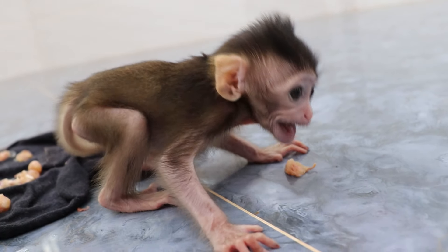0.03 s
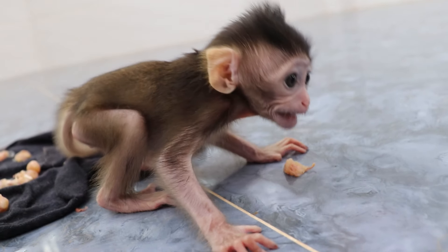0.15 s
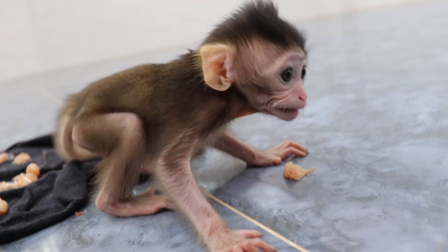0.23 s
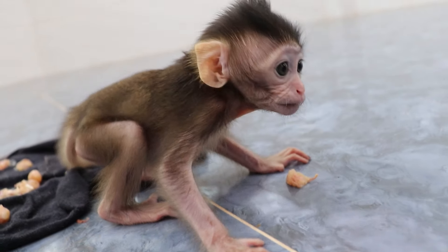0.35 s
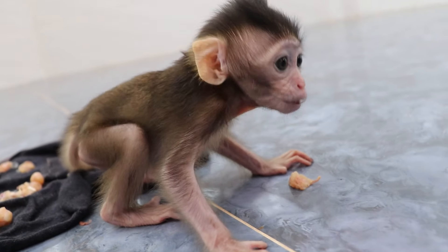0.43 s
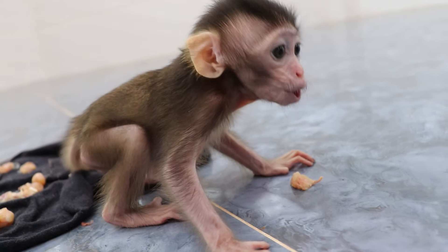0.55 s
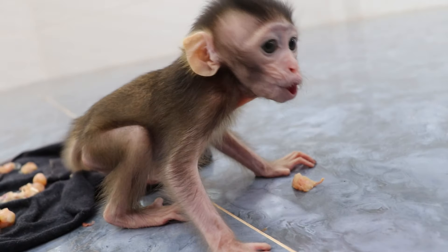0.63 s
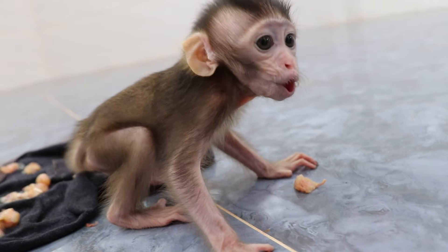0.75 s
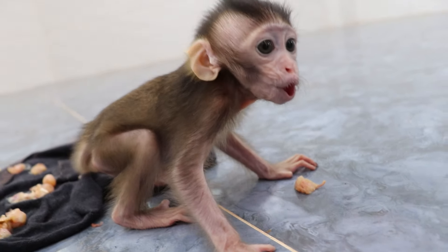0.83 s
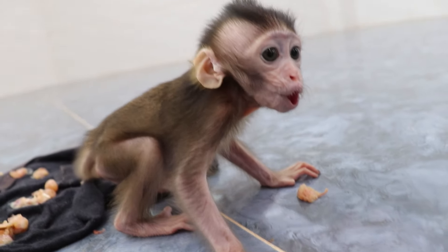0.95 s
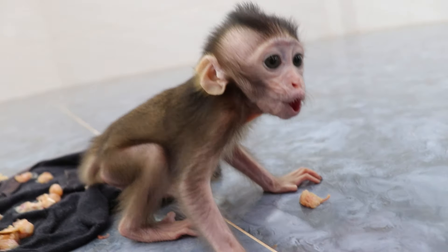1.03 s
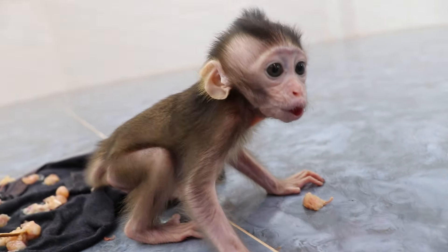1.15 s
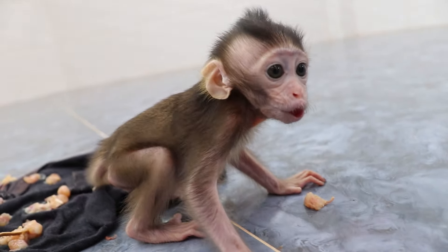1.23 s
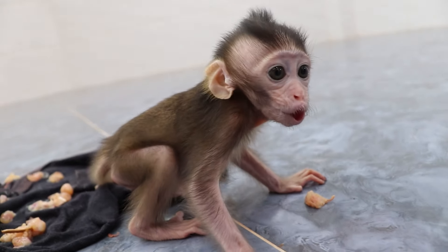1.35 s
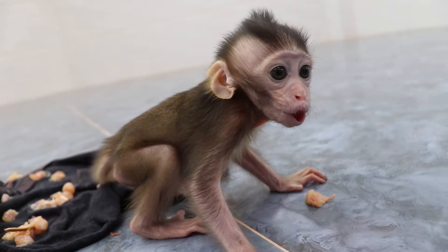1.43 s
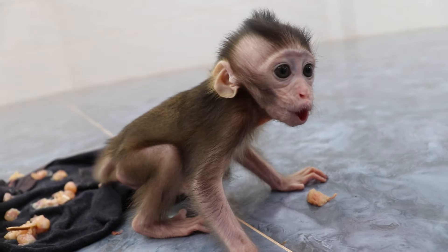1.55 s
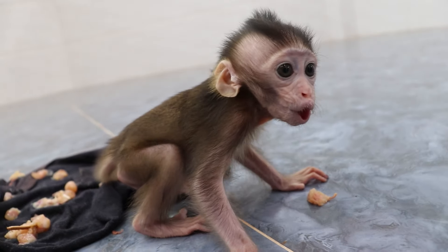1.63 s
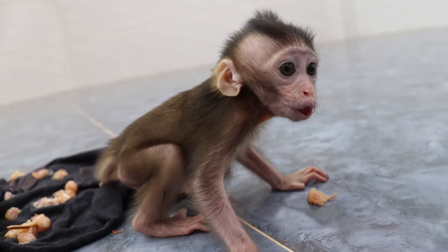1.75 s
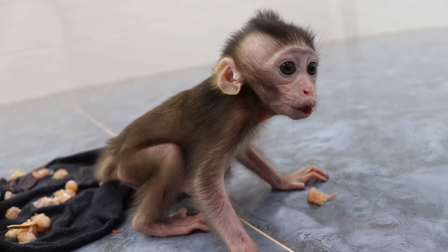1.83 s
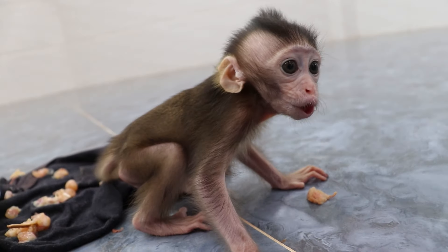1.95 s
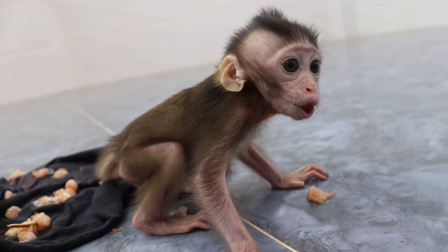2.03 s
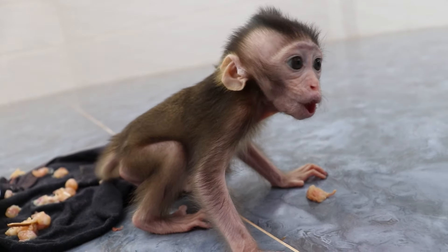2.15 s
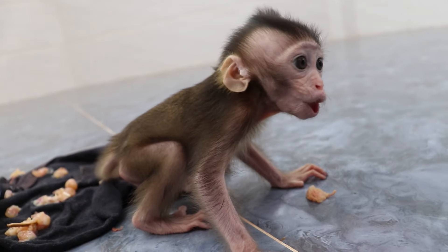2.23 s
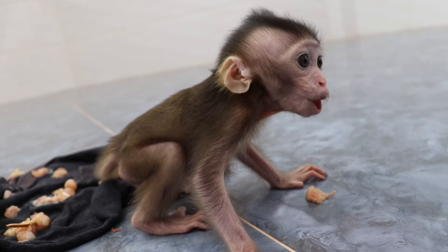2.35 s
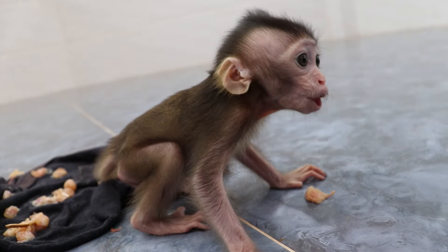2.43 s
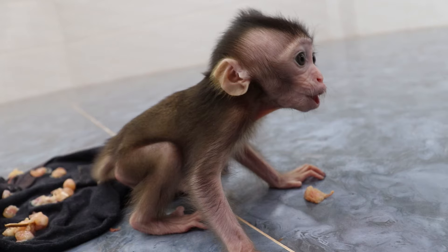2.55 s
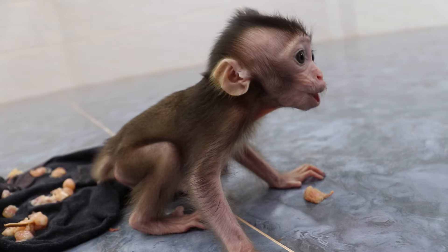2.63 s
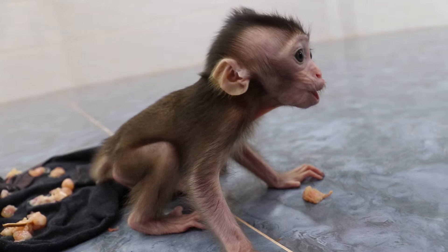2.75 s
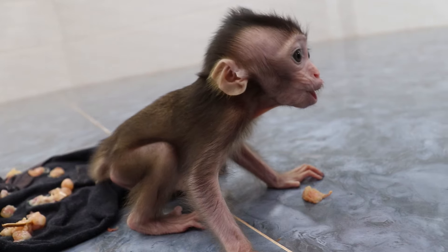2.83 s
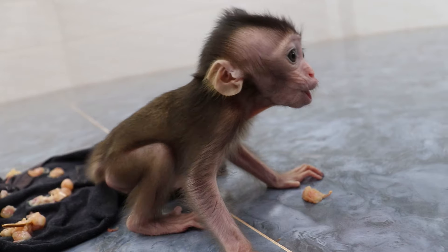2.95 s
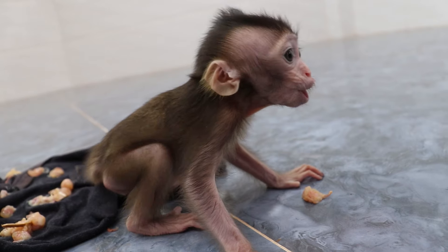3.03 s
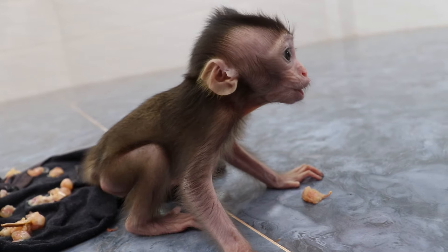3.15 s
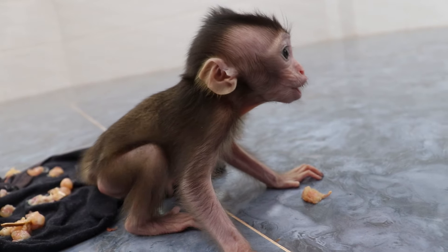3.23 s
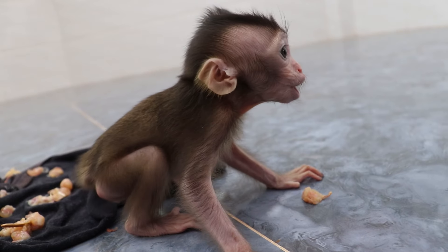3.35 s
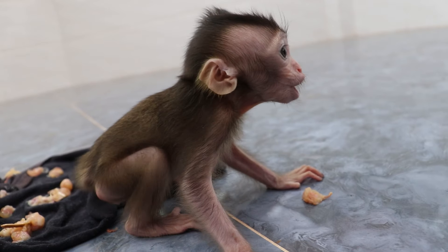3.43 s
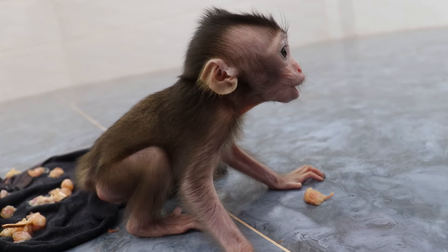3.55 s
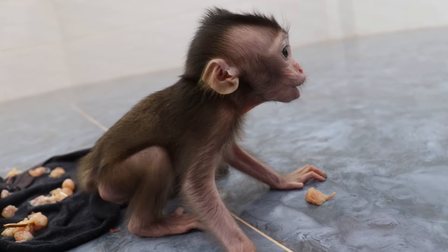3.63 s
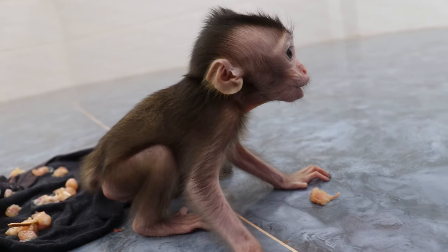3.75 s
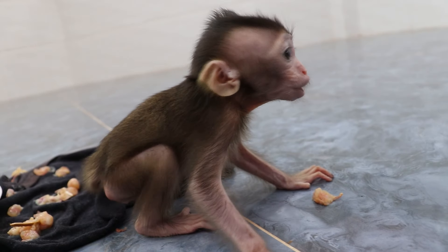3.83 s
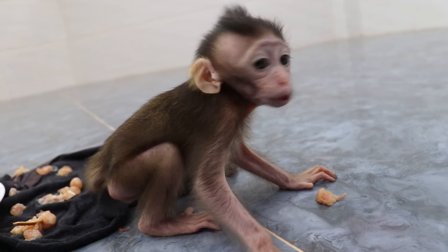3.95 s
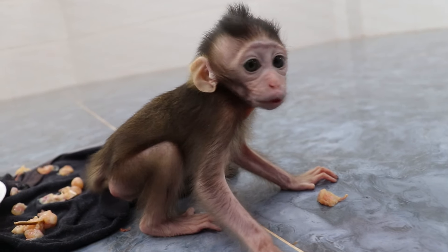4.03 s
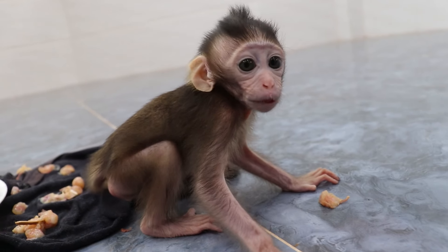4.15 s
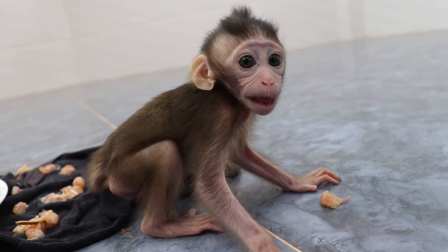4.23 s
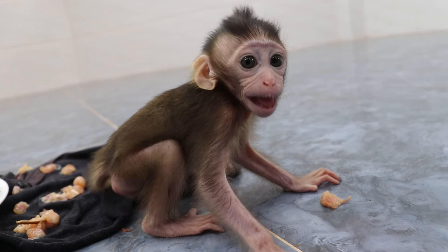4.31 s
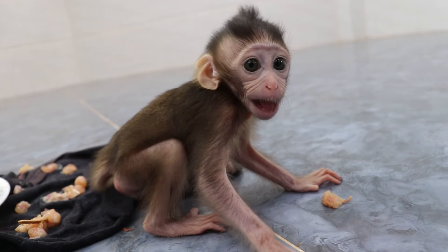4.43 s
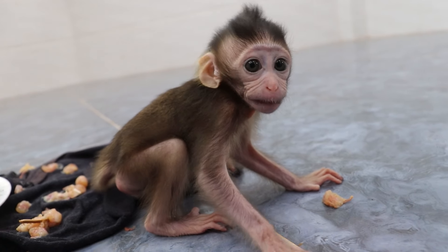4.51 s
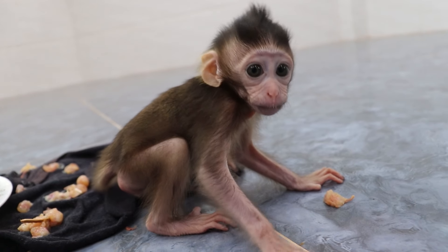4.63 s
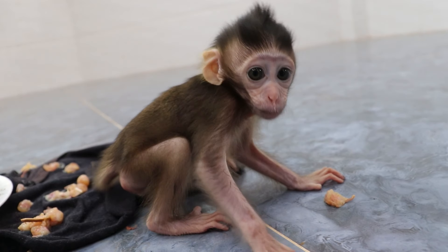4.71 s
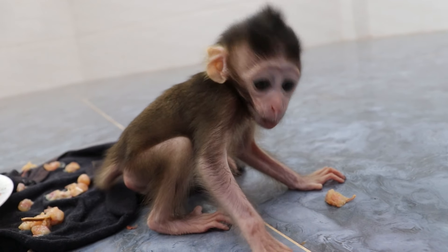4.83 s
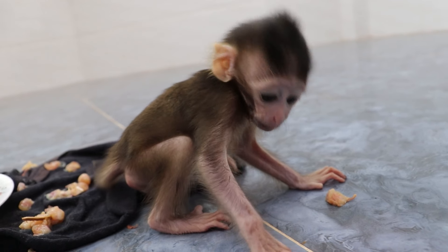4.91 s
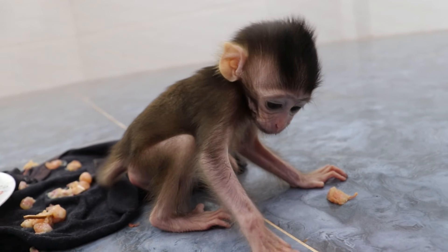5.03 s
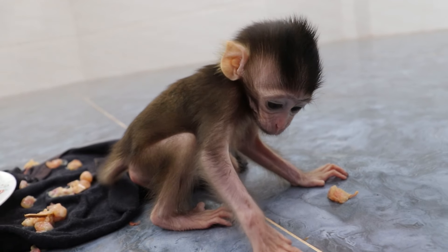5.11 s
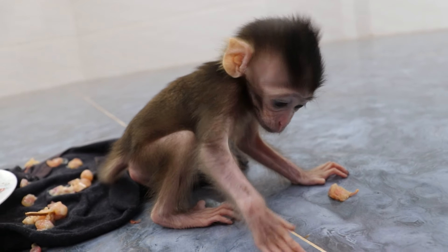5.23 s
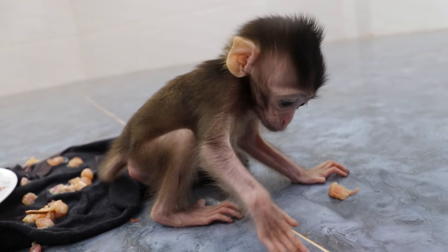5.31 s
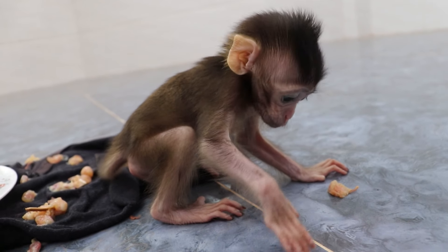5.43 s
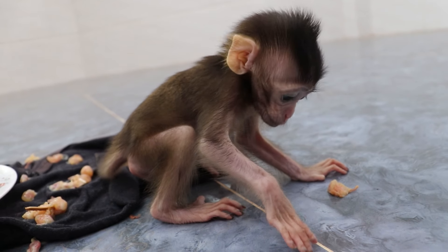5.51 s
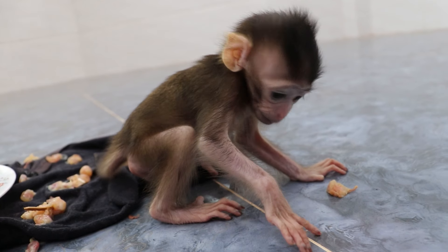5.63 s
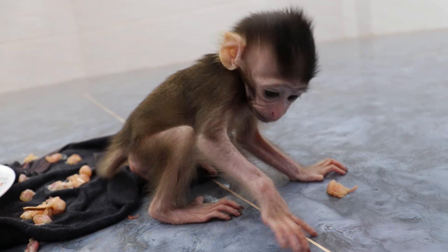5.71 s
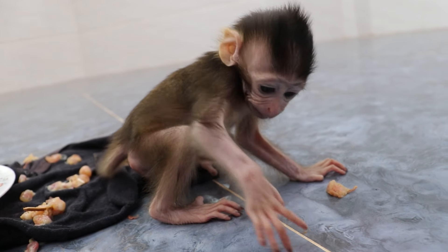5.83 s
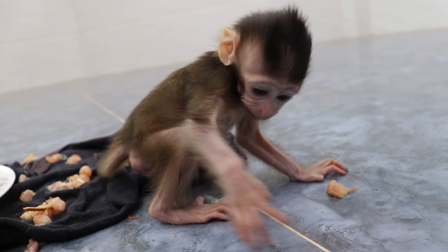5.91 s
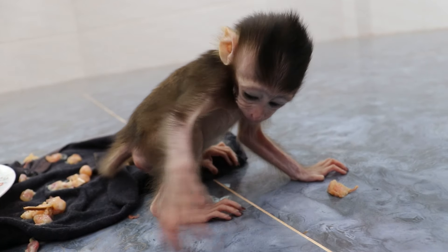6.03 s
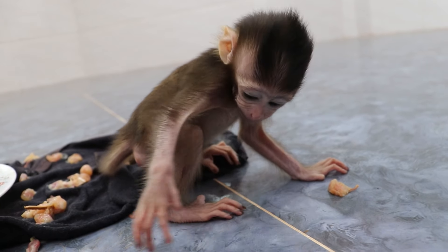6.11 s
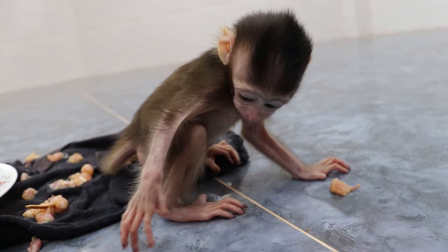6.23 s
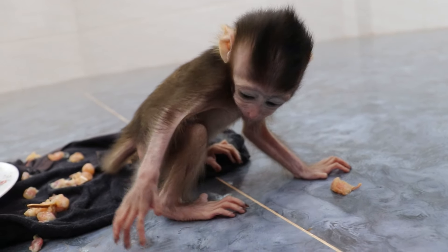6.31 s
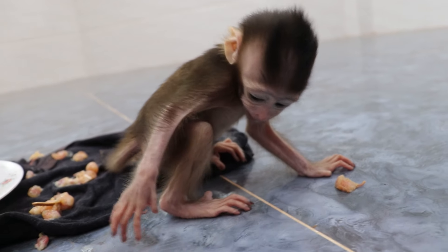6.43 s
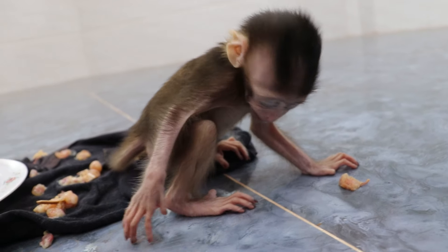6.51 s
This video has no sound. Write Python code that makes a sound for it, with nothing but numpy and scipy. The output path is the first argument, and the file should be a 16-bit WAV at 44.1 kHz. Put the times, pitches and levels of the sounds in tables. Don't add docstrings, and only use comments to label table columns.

```python
import sys
import numpy as np
from scipy import signal
from scipy.fft import rfft, irfft, next_fast_len
from scipy.io import wavfile
from scipy.ndimage import uniform_filter1d

SR = 44100
rng = np.random.default_rng(int(sys.argv[2]) if len(sys.argv) > 2 else 0)


def to_linear_factor(level_db):
    exponent = np.asarray(level_db, float) / 20
    return 10 ** exponent


def master(y):
    cut = np.clip(np.atleast_2d(y).T, -1, 1)
    pcm = np.round(cut * 32767)
    wavfile.write(sys.argv[1], SR, pcm.astype(np.int16))


N = 289737


def at_hz(points, hz):
    table_hz, values = np.array(points).T
    return np.interp(np.log(hz), np.log(table_hz), values)


def rms_one(x):
    return x / np.sqrt(np.mean(x ** 2) + 1e-20)


def drift(rate_hz, size):
    r = np.exp(-2 * np.pi * rate_hz / SR)
    noise = rng.standard_normal(size + 4000)
    wander = signal.lfilter([1], [1, -2 * r, r * r], noise)
    return rms_one(wander[4000:])


def resonate(x, modes):
    out = 0
    for k, (hz, width_hz, db) in enumerate(modes):
        r = np.exp(-np.pi * width_hz / SR)
        b = (1 - r * r) / 2 * np.array([1, 0, -1])
        a = [1, -2 * r * np.cos(2 * np.pi * hz / SR), r * r]
        out = out + (-1) ** k * to_linear_factor(db) * signal.lfilter(b, a, x)
    return out


def resonate_twice(x, modes):
    return rms_one(resonate(resonate(x, modes), modes))


def add(mix, s, sound, pan_db=0, room_db=0):
    i = round(s * SR)
    sound = sound[:N - i]
    gains_db = np.array([[pan_db / 2], [-pan_db / 2], [room_db]])
    mix[:, i:i + len(sound)] += sound * to_linear_factor(gains_db)


# (time [s], pitch [Hz])
COO_PITCH = [
    [(.696, 1204.5), (.724, 1255), (.808, 1327), (.852, 1332.5), (.884, 1396.5), (.984, 1439),
     (1.078, 1517.5), (1.132, 1501), (1.146, 1473)],
    [(1.496, 1331.5), (1.512, 1379.5), (1.53, 1448), (1.588, 1480), (1.616, 1536.5), (1.68, 1511),
     (1.722, 1547.5), (1.765, 1521)],
    [(2.142, 1364.5), (2.16, 1481.5), (2.206, 1474), (2.24, 1576), (2.276, 1545.5), (2.304, 1525),
     (2.37, 1543), (2.43, 1608), (2.462, 1556)],
    [(2.796, 1342), (2.808, 1396.5), (2.864, 1418), (2.916, 1508), (2.942, 1455), (2.976, 1457),
     (3.054, 1519), (3.1, 1555), (3.143, 1482.5)],
    [(3.478, 1723.5), (3.51, 1930.5), (3.54, 1972.5), (3.566, 1920.5), (3.596, 1959.5), (3.674, 1742),
     (3.708, 1670), (3.76, 1627), (3.834, 1590.5)],
]
# (time [s], level [dB])
COO_EFFORT = [
    [(0.696, -34), (0.704, -30), (0.718, -25.5), (0.846, -15.5), (0.886, -20), (0.914, -14), (1.132, -15.5),
     (1.146, -15)],
    [(1.496, -31), (1.502, -29.5), (1.518, -21.5), (1.692, -19.5), (1.72, -11.5), (1.752, -15),
     (1.765, -16.5)],
    [(2.142, -37), (2.154, -25), (2.286, -18), (2.312, -22.5), (2.344, -16), (2.416, -17.5), (2.424, -23.5),
     (2.462, -15.5)],
    [(2.796, -30), (2.806, -29), (2.868, -20.5), (3.068, -15), (3.08, -16.5), (3.11, -14), (3.136, -17.5),
     (3.143, -21.5)],
    [(3.478, -28), (3.486, -27), (3.5, -20.5), (3.54, -16.5), (3.582, -16.5), (3.59, -17.5), (3.792, -20),
     (3.834, -20)],
]
# (time after [s], pitch change [Hz], level change [dB])
VOICE_BREAK = [(.006, -51, -7.5), (0.017, -230, -13), (0.023, -290, -22)]
COO_AIR_DB = [-1, 0.7, 0.5, -3, -0.5]
# (room [dB], room for overtones [dB], left over right [dB],
# brightening over the call [dB], brightness [dB])
COO_PLACE = [(-1, -3, -0.5, 18, -2), (1.5, -4, 1.6, 12, 0), (2.1, -2, 2.5, 9, 2.6), (1.5, 0, 0, 18.5, 0.1),
             (7.5, -5, 0, 2.5, 4.5)]
# (frequency [Hz], level [dB])
MOUTH = [(2400, -34), (2700, -19), (3000, -12.5), (3400, -10.5), (3900, 0), (4200, -5), (4800, -17),
         (5800, -33)]
# (frequency [Hz], level [dB])
THROAT = [(4500, 37), (5500, -3.5), (6800, -28), (8000, -5.5), (9000, 5.5), (10300, -2.7), (12000, -15.5),
          (16500, -29)]
# (frequency [Hz], width [Hz], level [dB])
BREATH = [(1630, 610, 3), (3800, 1200, 6), (12000, 21000, -10)]
FIRST_DB_PER_OCTAVE = -8
SECOND_DB, THIRD_DB, UPPER_DB, BREATH_DB = 4.5, -13.5, -29.5, -26.5
PRESS_FOLLOWS = 0.51
BREATH_OPENS = 0.57
OPEN_AT = .7
GUST_DB = 1.5


def coos(mix):
    for pitch, effort, air_db, head in zip(COO_PITCH, COO_EFFORT, COO_AIR_DB, COO_PLACE):
        room_db, beam_db, pan_db, opening_db, bright_db = head
        fall = np.array(VOICE_BREAK)
        pitch_s, pitch_hz = np.vstack([pitch, np.add(pitch[-1], fall[:, :2])]).T
        effort_end = (pitch[-1][0], effort[-1][1])
        effort_s, effort_db = np.vstack([effort, np.add(effort_end, fall[:, ::2])]).T
        start, end = pitch_s[0], pitch_s[-1]
        t = np.arange(start, end, 1 / SR)
        size = len(t)

        hz = uniform_filter1d(np.interp(t, pitch_s, pitch_hz), size=400)
        hz = hz * (1 + .0006 * drift(40, size))
        phase = 2 * np.pi * np.cumsum(hz) / SR

        first_db = np.interp(t, effort_s, effort_db)
        mean_db = first_db.mean()
        press_db = mean_db + PRESS_FOLLOWS * (first_db - mean_db)
        opened = np.minimum((t - start) / (end - start) / OPEN_AT, 1)
        open_db = opening_db * (opened - .5)
        upper_db = press_db + UPPER_DB + bright_db + open_db
        breath_db = press_db + BREATH_DB + air_db + BREATH_OPENS * open_db

        low = to_linear_factor(first_db + FIRST_DB_PER_OCTAVE * np.log2(hz / 1500)) * np.sin(phase)
        middle = to_linear_factor(press_db + SECOND_DB + at_hz(MOUTH, 2 * hz)) * np.cos(2 * phase)
        middle += to_linear_factor(press_db + THIRD_DB + at_hz(MOUTH, 3 * hz)) * np.sin(3 * phase)
        upper = 0
        for k in range(4, 11):
            shimmer_db = 4 * drift(30, size)
            level = to_linear_factor(upper_db + at_hz(THROAT, k * hz) + shimmer_db)
            upper += level * (k * hz < 17000) * np.sin(k * phase)

        gust_db = GUST_DB * drift(13.4, size)
        breath = to_linear_factor(breath_db + gust_db) * resonate_twice(rng.standard_normal(size), BREATH)
        rasp = resonate_twice(rng.standard_normal(size), [(9200, 1600, 0)])
        breath += to_linear_factor(upper_db - 4.5) * rasp

        to_edge_s = np.minimum(t - start, end - t)
        fade = np.clip(to_edge_s / .006, 0, 1)
        slow_fade = np.clip(to_edge_s / .035, 0, 1)
        add(mix, start, fade * to_linear_factor(3.0) * low, pan_db, room_db)
        add(mix, start, fade * to_linear_factor(2.0) * middle, pan_db - 3.0, beam_db)
        add(mix, start, slow_fade * (upper + breath), pan_db + 4.0, beam_db - 1.5)


# (time
# [s], length [s], start pitch [Hz], end pitch [Hz], level [dB])
THROATY = [(0.156, 0.0079, 3210, 2200, -11), (0.168, 0.0097, 2250, 1345, -23),
           (4.388, 0.013, 7170, 6500, -12), (4.416, 0.0048, 4210, 3750, -7),
           (5.916, 0.0096, 3230, 2630, -16.5), (5.921, 0.0121, 5580, 4750, -15),
           (5.932, 0.0045, 2300, 990, -15.5), (5.97, 0.0085, 550, 483, -23.5),
           (6.498, 0.015, 5500, 5330, -11)]
# (time
# [s], length [s], start pitch [Hz], end pitch [Hz], level [dB])
THIN = [(0.149, 0.013, 4610, 2830, -19), (.148, 0.014, 9560, 8100, -22.5), (.2, 0.0096, 11100, 6570, -29),
        (4.37, 0.0021, 3460, 3550, -26), (4.394, 0.017, 10500, 9140, -7), (5.9126, 0.0011, 4300, 4220, -10),
        (6.2314, 0.0044, 3980, 3800, -10), (6.503, 0.01, 4450, 4070, -14)]
# (time [s], length [s], start pitch [Hz], end pitch [Hz], level [dB])
TURNED_AWAY = [(0.15, 0.0228, 4960, 4534, -19), (4.363, 0.001, 3620, 2920, -17),
               (4.377, 0.0053, 3940, 3380, -24), (5.923, 0.0074, 2800, 2340, -16.5)]
# (octave [dB], room [dB])
CHIRP_KINDS = [
    (-17.5, -1),
    (-31, -4.5),
    (-23, 11.5),
]
BEAM_DB_PER_OCTAVE, BEAM_CENTRE_HZ = 8, 4300
CHIRP_ROUGH = .2


def chirps(mix):
    for rows, (octave_db, room_db) in zip([THROATY, THIN, TURNED_AWAY], CHIRP_KINDS):
        for s, length, start_hz, end_hz, db in rows:
            u = np.arange(0, 1, 1 / (length * SR))
            hz = start_hz * (end_hz / start_hz) ** u ** 1.153
            phase = 2 * np.pi * np.cumsum(hz) / SR
            tone = np.sin(phase) + to_linear_factor(octave_db) * np.sin(2 * phase)
            swell = np.sin(np.pi * u) ** .7
            swell = swell * (1 + CHIRP_ROUGH * drift(700, len(u)))
            pan_db = BEAM_DB_PER_OCTAVE * np.log2(start_hz / BEAM_CENTRE_HZ)
            add(mix, s, to_linear_factor(db) * swell * tone, np.clip(pan_db, -5, 5), room_db)


# (time [s], length [s])
HISS_SPANS = [
    (.143, .005),
    (.149, .021),
    (4.388, .033),
    (5.922, .014),
    (6.242, .016),
    (6.4755, .0345),
]
# (level [dB], tilt [dB per octave], room [dB], left over right [dB])
HISSES = [(-24.5, -12, 9, 8), (-27, -8.5, 3.5, 4), (-13, 0.5, 2.4, 5.5), (-31.5, 4, -2.5, 1),
          (-29.5, -7.5, -1.5, 2), (-9.5, -0.5, -1.5, -0.5)]
# (frequency [Hz], width [Hz], level [dB])
HISS_MOUTH = [(3000, 2700, -29), (4300, 1950, 2), (7420, 570, 9.5), (10150, 2000, 6.5), (12500, 3000, -2.5),
              (14500, 1700, -8)]


def hisses(mix):
    high_pass = signal.butter(3, 2600, "high", fs=SR, output="sos")
    for (s, length), (db, tilt_db, room_db, pan_db) in zip(HISS_SPANS, HISSES):
        u = np.arange(0, 1, 1 / (length * SR))
        air = 0
        for hz, width_hz, level_db in HISS_MOUTH:
            mode = [(hz, width_hz, level_db + tilt_db * np.log2(hz / 7000))]
            flutter = to_linear_factor(3 * drift(90, len(u)))
            air = air + flutter * resonate(rng.standard_normal(len(u)), mode)
        air = rms_one(signal.sosfilt(high_pass, air))
        ends = np.clip(np.minimum(u, 1 - u) / .08, 0, 1)
        add(mix, s, to_linear_factor(db) * ends * air, np.clip(pan_db, -4, 4), room_db)


# (time [s], level [dB], ring [Hz], snap [dB], left over right [dB])
CLICKS = [(.1348, -21, 3000, -16, 1), (.51, -37, 703, -47, 6), (.584, -47, 850, -39.5, -32),
          (2.17, -35, 520, -62, 4), (4.2935, -28, 2520, -53, 0), (4.315, -37.5, 920, -44, 0),
          (4.3628, -51, 623, -17, 2), (4.44, -38.5, 730, -51, 0), (4.987, -55, 1700, -94, -9),
          (5.064, -35.5, 3200, -51, -3), (5.2, -42, 2600, -44, -2), (5.31, -36.5, 1010, -32, -3),
          (5.562, -37.5, 900, -29, 3), (5.685, -48, 530, -58, -18), (5.7, -45, 2520, -53, -18),
          (5.752, -43, 3540, -50, -0.5), (6.2205, -51, 4040, -17, 5), (6.2415, -44, 1170, -22, -6),
          (6.473, -26.5, 1440, -40, 0), (6.525, -34.5, 527, -50, 0)]


def clicks(mix):
    t = np.arange(900) / SR
    for s, db, hz, snap_db, pan_db in CLICKS:
        ring = np.sin(2 * np.pi * hz * t) * np.exp(-t * hz / 1.98)
        ring = ring * (1 - np.exp(-t * hz * 8.1))
        grit = rng.standard_normal(901)
        snap = (grit[1:] + grit[:-1] / 4) * np.exp(-t / 0.0007) / 2
        add(mix, s, to_linear_factor(db + 3.5) * ring + to_linear_factor(snap_db) * snap, pan_db, room_db=6.5)


# (frequency [Hz], lag [samples])
RIGHT_LAG = [(1500, 2.8), (4000, 2.4), (9000, 1.6), (16000, .8)]


def place(sources, lag_share):
    mix = np.zeros((3, N))
    for source in sources:
        source(mix)
    size = next_fast_len(N + 64)
    hz = np.maximum(np.fft.rfftfreq(size, 1 / SR), 1)
    lag_s = lag_share * at_hz(RIGHT_LAG, hz) / SR
    turned = rfft(mix[1], size) * np.exp(-2j * np.pi * hz * lag_s)
    return np.array([mix[0], irfft(turned, size)[:N], mix[2]])


# (frequency [Hz], time [s])
ROOM_T60 = [(500, .9), (1500, .85), (2000, .95), (4000, .9), (5500, .78), (7700, .65), (11000, .56),
            (16000, .36)]
ROOM_DB = -11
WALL_ECHO_S, WALL_SPREAD_S, WALL_ECHO_DB = 0.056, .014, -13


def room(feed):
    t = np.arange(round(1.2 * SR)) / SR
    tail = 0
    edges = 200 * 2 ** np.arange(0, 6.6, .5)
    for low, high in zip(edges, edges[1:]):
        band_pass = signal.butter(2, [low, high], "band", fs=SR, output="sos")
        band = signal.sosfilt(band_pass, rng.standard_normal((2, len(t))))
        tail = tail + band * to_linear_factor(-60 * t / at_hz(ROOM_T60, np.sqrt(low * high)))
    lump = to_linear_factor(WALL_ECHO_DB + 13) * np.exp(-((t - WALL_ECHO_S) / WALL_SPREAD_S) ** 2)
    tail = tail * (np.clip(t / 0.0064, 0, 1) + lump)
    tail = tail / np.sqrt(np.sum(tail ** 2) / 2)
    return to_linear_factor(ROOM_DB) * signal.fftconvolve(feed[None], tail, axes=1)[:, :N]


# (frequency [Hz], level [dB per Hz])
FLOOR = [(25, -23), (102, -6), (212, -9), (450, -16), (1480, -18), (2550, -17.5), (7110, -26.5),
         (16000, -40.5)]
# (frequency [Hz], likeness [-1 to 1])
LIKENESS = [(60, 1), (240, 0.55), (950, 0.25), (3770, -0.12), (15000, 0.23)]
# (frequency [Hz], width [Hz], level [dB])
HUM = [(59.1, 6.9, 1.5), (98.7, 30, -0.5), (45, 9.1, -1)]
FLOOR_DB = -48.8
HUM_DB, HUM_SWAY_DB = -55, 2
HUM_EASES_S, HUM_EASES_DB = 3.1, -5.5


def background():
    t = np.arange(N) / SR
    hz = np.maximum(np.fft.rfftfreq(N, 1 / SR), 1)
    alike = np.clip(at_hz(LIKENESS, hz), -1, .92)
    mid, side = rfft(rng.standard_normal((2, 2, N)))
    shared, own = np.sqrt(1 + alike) * mid, np.sqrt(1 - alike) * side
    air, hum = np.stack([shared + own, shared - own], axis=1)

    colour = to_linear_factor(at_hz(FLOOR, hz)) * np.minimum(hz / 25, 1) ** 3
    air_db = FLOOR_DB + 2.0 * drift(0.86, N)
    air = to_linear_factor(air_db) * rms_one(irfft(air * colour, N))

    easing_db = HUM_EASES_DB * np.clip(t - HUM_EASES_S, 0, .4) / 0.42
    hum_db = HUM_DB + easing_db + HUM_SWAY_DB * drift(1.9, N)
    hum = to_linear_factor(hum_db) * resonate_twice(irfft(hum, N), HUM)
    return air + hum


def scene():
    mix = place([coos, clicks], lag_share=0.97)
    mix = mix + place([chirps, hisses], lag_share=.7)
    return mix[:2] + room(mix[2]) + background()


def roll_off(x):
    return signal.sosfilt(signal.butter(12, 16870, fs=SR, output="sos"), x)


def record(dry):
    top_cut = signal.cheby1(8, 1, 16200, fs=SR, output="sos")
    dry = signal.sosfilt(top_cut, dry)
    bright = np.abs(np.diff(dry, prepend=0)).max(axis=0)
    bright_db = 20 * np.log10(uniform_filter1d(bright, size=200) + 1e-9)
    over_db = np.maximum(bright_db + 22, 0)
    release_db = 90 * np.arange(N) / SR
    held_db = np.maximum.accumulate(over_db + release_db) - release_db
    mix = dry * to_linear_factor(-.45 * uniform_filter1d(held_db, size=200))
    return roll_off(mix)


dry = scene()
out = record(dry)
master(out)
```